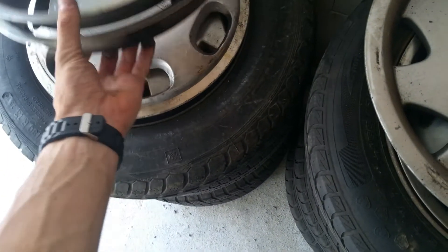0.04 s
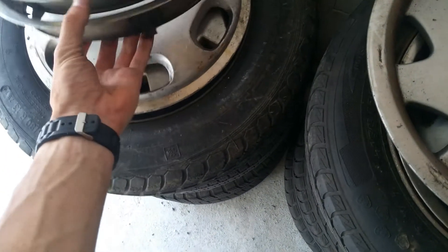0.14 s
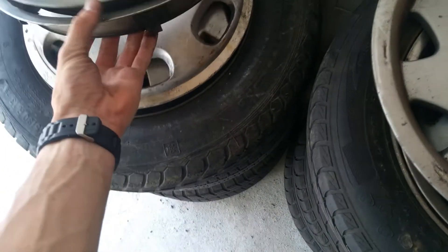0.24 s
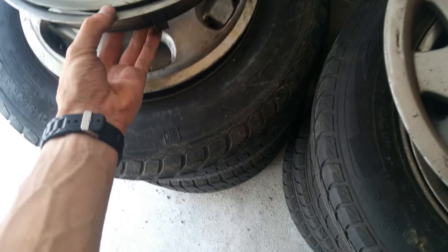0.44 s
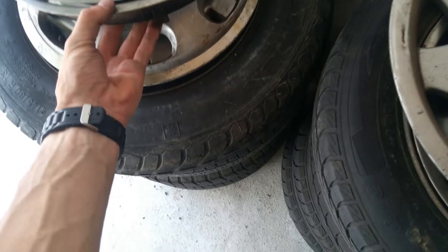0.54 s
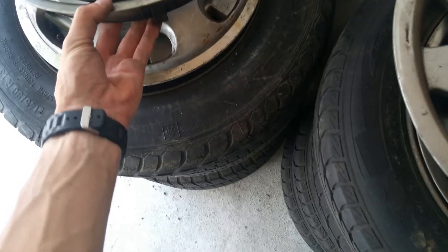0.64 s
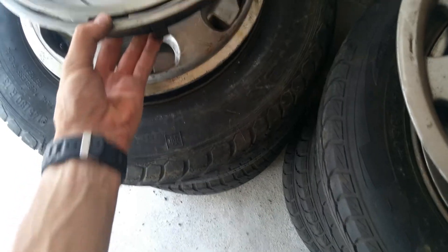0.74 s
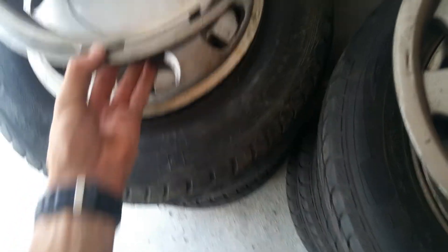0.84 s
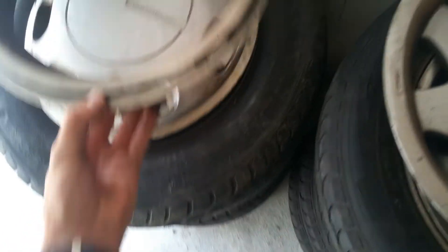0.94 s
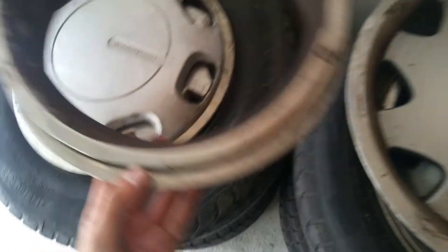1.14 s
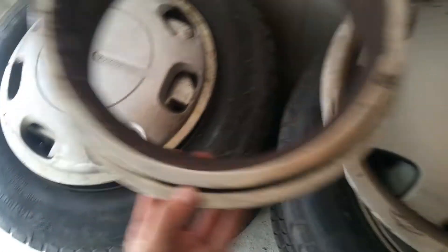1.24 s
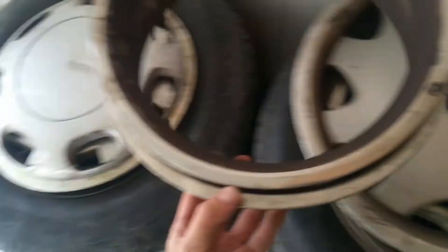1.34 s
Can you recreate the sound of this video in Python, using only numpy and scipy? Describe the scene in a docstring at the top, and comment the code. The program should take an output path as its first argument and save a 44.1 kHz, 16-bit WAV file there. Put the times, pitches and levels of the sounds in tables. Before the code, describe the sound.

A brief shrill metal-on-metal squeal as steel wheel rings are pulled apart, then small quiet clicks

```python
"""In a yard, thin steel trim rings are pulled off a stack, an arm's length from a hand-held stereo recorder.
An edge squeals as it sticks and slips, with one lone tone beside it, and later chatters at a rougher rate.
Gritty scraping and duller brushing are random grains; they and the slips ring the steel's many resonances.
The whole hoop wobbles low; small ticks, a creak and a faint touch sound as the rings shift in the hand.
Hard ground and walls echo it as fading noise tails, over a quiet outdoor floor of coloured noise."""
import sys
import numpy as np
from scipy import signal
from scipy.fft import rfft, irfft, next_fast_len
from scipy.io import wavfile
from scipy.ndimage import uniform_filter1d, minimum_filter1d

SR = 44100
rng = np.random.default_rng(int(sys.argv[2]) if len(sys.argv) > 2 else 0)


def file_out(sig):
    """Save sig as 16-bit WAV at sys.argv[1]."""
    # one column per channel
    cols = np.atleast_2d(sig).T
    # limit, then scale
    lim = np.clip(cols, -1, 1)
    pcm = np.round(lim * 32767).astype(np.int16)
    wavfile.write(sys.argv[1], SR, pcm)


def voltage_ratio(level):
    """Linear amplitude factor for a level in decibels (scalar or array-like)."""
    return 10 ** (np.asarray(level, float) / 20)


N = 61739  # length of the scene in samples


def squeal():
    """Edge on edge sticks and slips at a near-steady rate, which gives a tone with overtones."""
    # locked squeal: (time [s], slip rate [Hz], level [dB], irregularity [share of the rate])
    locked = [(.218, 1193, -59, 0.0069), (.229, 1186, -23, 0.0091), (.245, 1196, -20, 0.014),
              (.254, 1242, -7, 0.021), (.272, 1238, -24, 0.002), (.282, 1248, -17, 0.0042),
              (.315, 1253, -18, 0.0017), (.333, 1237, -24, 0.0024), (.352, 1203, -53, 0.0033),
              (.385, 1250, -37.5, .004), (.41, 1250, -105, .004)]
    # overtones of the slip rate: (multiple, relative level [dB])
    overtones = [(1, -2), (2, -2.5), (3, 0.5), (4, -6.5), (5, -10)]
    return slipping(locked, overtones, curve(locked, order=3), flutter_db=6.0)


def whistle():
    """A second spot of the edge sings one tone whose pitch wavers slightly."""
    # loudness of the tone: (time [s], level [dB])
    loudness = [(.245, -52), (.257, -23.5), (.28, -14.5), (.325, -31.5), (.35, -31.5), (.37, -81.5)]
    pitch_hz = 2415 * (1 + .002 * walk(156.4))
    return np.sin(2 * np.pi * np.cumsum(pitch_hz) / SR) * gain(loudness, order=1)


def chatter():
    """Later the edge slips without locking, so its rate wanders more."""
    # unlocked slipping: (time [s], slip rate [Hz], level [dB])
    unlocked = [(.45, 1280, -65), (.456, 1267, -22.5), (.463, 1279, -25), (.497, 1264, -27.5),
                (.507, 1240, -28.5), (.518, 1235, -21), (.54, 1232, -25.5), (.56, 1202, -37),
                (.58, 1330, -62.5)]
    # overtones of the slip rate: (multiple, relative level [dB])
    overtones = [(1, -0.5), (2, -2), (3, 5), (4, -1), (5, -29)]
    return slipping(unlocked, overtones, wander=.05, flutter_db=0.5)


def slipping(table, orders, wander, flutter_db):
    """Slips repeat at an unsteady rate; the level of each multiple of that rate flutters."""
    rate_hz = curve(table, order=1) * (1 + wander * walk(400))
    phase = 2 * np.pi * np.cumsum(rate_hz) / SR
    tone = sum(voltage_ratio(db + flutter_db * walk(170)) * np.sin(k * phase) for k, db in orders)
    return unit(tone) * gain(table, order=2)


def scrape():
    """Steel rasps on steel: returns the plain grains and the same grains coloured as grit."""
    # loudness of the rasp before the 6 dB lift below: (time [s], level [dB])
    loudness = [(0.19, -74), (0.22, -107), (0.232, -27), (0.24, -23.5), (0.316, -28), (0.384, -61.5),
                (0.448, -73), (0.462, -33), (0.546, -46), (0.59, -80), (0.686, -93), (0.694, -50.5),
                (0.734, -75.5), (0.75, -49.5), (0.796, -90.5), (0.86, -94.5)]
    # tone colour of the grit: (frequency [Hz], relative level [dB per Hz])
    grit = [(500, -45.5), (950, -11.5), (1300, -8), (2000, -16), (2850, -23.5), (3700, 1.5), (5000, -1.5),
            (6200, -2.5), (7000, -14.5), (10000, -15), (15000, -22.5), (16500, -38)]
    grains = rubbing(loudness, hiss=0.95) * voltage_ratio(6)
    return grains, shaped(grains, grit)


def brushing():
    """Hands and rings brush together: the same kind of grains, but duller."""
    # loudness of the brushing before the 6.5 dB lift below: (time [s], level [dB])
    loudness = [(0.0, -51.5), (0.014, -48.5), (0.054, -51.5), (0.07, -58.5), (0.104, -48.5), (0.116, -50.5),
                (0.132, -36.5), (0.198, -56.5), (0.24, -46), (0.248, -60), (0.358, -51), (0.376, -59.5),
                (0.466, -53.5), (0.478, -41), (0.606, -56.5), (0.62, -54.5), (0.704, -58), (0.72, -49.5),
                (0.74, -59.5), (0.758, -48.5), (0.782, -64), (0.94, -88)]
    # tone colour of the brushing: (frequency [Hz], relative level [dB per Hz])
    dull = [(150, -35.5), (250, -12), (470, -18.5), (703, -6.5), (2010, -3.5), (2200, -7.5), (3780, -6.5),
            (14100, -28.5), (15700, -35.5), (16500, -65.5)]
    return shaped(rubbing(loudness, hiss=0.17), dull) * voltage_ratio(6.5)


def rubbing(table, hiss):
    """Dense grains of uneven size, plus a hiss that differs left and right."""
    grains_per_s, spread_db = 9000, 2.2
    chance, side, size = rng.random((3, N))
    grains = (chance < grains_per_s / SR) * np.sign(side - .5)
    grains = grains * voltage_ratio(-spread_db * np.log(size + 0.001017))  # many small grains, few large ones
    noise = unit(grains) + hiss * rng.standard_normal((2, N))
    return noise * gain(table, order=1) * voltage_ratio(1.1 * walk(130))


def steel_ring(drive):
    """The steel answers slips and rubbing with many resonances; the hand damps them."""
    # resonances before the cap on fade time: (frequency [Hz], gain at resonance [dB], 60 dB fade time [s])
    resonances = [(1025, 4, 0.21), (1206, -3.5, .2), (1258, -8.5, 0.18), (1390, -12.5, .15),
                  (1500, -6.5, .15), (1630, -14.5, 0.18), (2032, 0.5, 0.31), (2390.3, 7.5, 0.38),
                  (2499, -2, 0.44), (2702, 0, 0.46), (2880, -12.5, 0.16), (3082, 5.5, .2),
                  (3692, -10, 0.05), (3630, -11, 0.36), (3773, 0.5, 0.1), (3790, -14.5, .35),
                  (4120, -0.5, 0.38), (4060, -12.5, .2), (4130, -7.5, 0.16), (4300, -13, .2),
                  (4610, -3, 0.54), (5000, -1.5, 0.39), (5166, -26, 0.076), (4930, -19, 0.33),
                  (5012, 6.5, 0.13), (5155, 2.5, 0.043), (5530, -2, .15), (5590, -4, .15),
                  (5844, -1.5, 0.043), (5840, -20, 0.099)]
    longest_s = .26
    held = [(hz, db, min(t60, longest_s)) for hz, db, t60 in resonances]
    return high(ring(drive, held, phase_rad=0.37), 930)


def ring(x, modes, phase_rad):
    """Resonators with a set gain at the centre, each with its own phase between left and right."""
    out = np.zeros((2, N))
    sides = np.array([[1], [-1]])
    for (hz, db, t60), turn in zip(modes, rng.standard_normal(len(modes))):
        r = np.exp(-np.log(1000) / (max(t60, .002) * SR))  # loss per sample
        z = signal.lfilter([2 * (1 - r) * voltage_ratio(db)], [1, -r * np.exp(2j * np.pi * hz / SR)], x)
        out += np.imag(z * np.exp(.5j * phase_rad * turn * sides))
    return out


def balance(x):
    """Tilts the tone colour between left and right, half the difference on each side."""
    # difference between the sides: (frequency [Hz], left minus right [dB])
    difference = [(60, -7), (110, 0.5), (200, 1.5), (380, 1.0), (700, 2), (1290, -1), (2380, -2.5),
                  (4400, -9.5), (8120, 6), (15000, 7.5)]
    return np.array([colour(x[0], difference, share=.5), colour(x[1], difference, share=-.5)])


def hoop():
    """The whole hoop wobbles at low pitches, shaken by the hand and knocked now and then."""
    # wobbles of the hoop: (frequency [Hz], relative gain [dB], 60 dB fade time [s])
    wobbles = [(100.8, 4.5, 0.23), (125, -6, .25), (193, -10.5, 0.16), (255.7, -5, 0.37), (281.3, -7, 0.12),
               (587.5, -14.5, .25), (690, -18.5, .2)]
    # how hard the hand shakes it: (time [s], level [dB])
    shaking = [(0.0, -45), (0.03, -50), (0.096, -46.5), (0.14, -36), (0.322, -48), (0.342, -59.5),
               (0.506, -40), (0.548, -48.5), (0.564, -56), (0.618, -50), (0.724, -48.5), (0.758, -53),
               (0.79, -51), (0.886, -87), (1.038, -71), (1.256, -69), (1.288, -70.5), (1.4, -83.5)]
    # blows that set it wobbling: (time [s], level [dB])
    blows = [(.137, -26), (.47, -36.5), (.49, -39), (.78, -37.5), (1.283, -52)]
    t = np.arange(N) / SR
    push = high(rng.standard_normal(N), 87)
    shaken = ring(push * voltage_ratio(curve(shaking, order=1)), wobbles, .15) / np.std(ring(push, wobbles, 0))

    def struck(hits):
        """Each blow is a smooth push about 2 ms wide."""
        pushes = sum(voltage_ratio(db) * np.exp(-((t - s) / .002) ** 2 * 8) for s, db in hits)
        return ring(pushes, wobbles, .1)

    one_blow_peak = np.abs(struck([(.1, 0)])).max()
    knocked = high(struck(blows), 66.0) / one_blow_peak
    return (shaken + knocked) * voltage_ratio(np.array([[.8], [-.8]]))  # left a little louder


def ticks():
    """Each tick is a short crack and one quickly fading note."""
    # ticks and knocks: (time [s], level [dB], pitch [Hz], 60 dB fade time [s], left minus right [dB])
    knocks = [(.016, -37, 767, 0.066, 3), (.1335, -22.5, 2080, 0.0073, -9.5),
              (.1345, -20.5, 1083, .02, -0.5), (.138, -21, 702, 0.014, 4), (.476, -40.5, 660, 0.0614, -7),
              (.697, -42.5, 5280, 0.052, 0), (.752, -40, 5240, 0.08, -2), (.754, -39.5, 603, .08, 2),
              (0.755, -35, 1500, 0.0208, -5), (1.2527, -28, 4620, 0.0074, -3.5),
              (1.2533, -38.5, 2490, .004, -11.5), (1.295, -47, 560, .05, 3),
              (1.333, -32.5, 1880, 0.0034, -15.5), (1.359, -36, 960, 0.019, -2.5),
              (1.36, -41, 418, 0.022, 3), (1.378, -49.5, 885, 0.055, 3)]
    crack_db, crack_s = -22.5, 0.00075  # level beside the note, fade constant
    out, t = np.zeros((2, N)), np.arange(N) / SR
    for s, db, hz, t60, pan_db in knocks:
        age = np.maximum(t - s, 0)
        crack = np.diff(rng.standard_normal(N + 1)) * np.exp(-age / crack_s) * voltage_ratio(crack_db)
        note = np.sin(2 * np.pi * hz * age) * np.minimum(age * hz, 1) * 1000. ** (-age / t60)
        out += (t >= s) * voltage_ratio(db) * (note + crack) * voltage_ratio(np.array([[pan_db], [-pan_db]]) / 2)
    return out


def creak():
    """A faint, brief buzz with its octave; pitch and level waver."""
    # the creak: length [s], pitch [Hz], level [dB], octave beside the pitch [dB]
    length, hz, db, octave_db = (.024, 865, -51, -3)
    age = np.arange(N) / SR - 1.277  # seconds since it starts
    phase = 2 * np.pi * np.cumsum(hz * (1 + .03 * walk(250))) / SR
    shape = np.clip(age / .004, 0, 1) * np.exp(-np.maximum(age - length, 0) / .01)
    return voltage_ratio(db + 4.0 * walk(120)) * shape * (np.sin(phase) + voltage_ratio(octave_db) * np.sin(2 * phase))


def touch():
    """One faint touch of the rims: a bright band of noise that fades."""
    # the touch: level [dB], lowest and highest frequency [Hz], 60 dB fade time [s]
    db, low_hz, high_hz, t60 = (-53, 3400, 6000, .14)
    age = np.arange(N) / SR - .913  # seconds since it starts
    band_pass = signal.butter(3, [low_hz, high_hz], "band", fs=SR, output="sos")
    band = signal.sosfilt(band_pass, rng.standard_normal((2, N)))
    return unit(band) * voltage_ratio(db) * (age > 0) * 1000. ** (-np.maximum(age, 0) / t60)


def grip():
    """Fingers shift on the rims at the end: soft coloured grains."""
    # loudness of the fingers: (time [s], level [dB])
    loudness = [(1.24, -92.5), (1.252, -62.5), (1.266, -69.5), (1.284, -55), (1.338, -56), (1.35, -65.5),
                (1.358, -54.5), (1.4, -60)]
    # tone colour of the fingers: (frequency [Hz], relative level [dB per Hz])
    soft = [(90, -3.5), (200, -6.5), (550, -1), (1000, -6), (2000, -4), (4000, -7), (6000, -20),
            (15000, -31.5), (16500, -51)]
    return shaped(rubbing(loudness, hiss=0.52), soft)


def echoes(x):
    """Hard ground and walls: a noise tail for each side, treble dying first."""
    level_db, t60_s, treble_t60_s, gap_s = -3.5, 0.3, 0.1, 0.0036
    t = np.arange(SR // 2) / SR
    low = signal.lfilter([.35], [1, -.6], rng.standard_normal((2, len(t))))
    full = 1.2 * rng.standard_normal((2, len(t)))
    tail = low * 1000. ** (-t / t60_s) + full * 1000. ** (-t / treble_t60_s)
    tail = tail * (t > gap_s)
    tail = tail / np.sqrt(np.sum(tail ** 2) / 2)
    return signal.fftconvolve(x, tail, axes=1)[:, :N] * voltage_ratio(level_db)


def yard():
    """Distant rumble and air as drifting noise; the bass is nearly the same left and right."""
    # tone colour of the yard: (frequency [Hz], relative level [dB per Hz])
    outdoors = [(15, -33.5), (25, -12), (167, -5.5), (358, -19), (389, -15.5), (617, -21), (706, -25),
                (854, -24.5), (1510, -26.5), (14000, -43), (16500, -45.5)]
    mid, side = rng.standard_normal((2, N))
    side = colour(side, [(100, -16.5), (400, -8.5), (1500, 2.5), (8000, -0.5)])
    floor = colour(mid + side * np.array([[1], [-1]]), outdoors)
    return unit(floor) * voltage_ratio(-59 + 1.5 * walk(1))


def unit(x):
    """Scales to an rms level of 1."""
    return x / np.sqrt(np.mean(x ** 2))


def curve(table, order):
    """Draws straight lines through one column of a table, over time."""
    rows = np.array(table, float)
    return np.interp(np.arange(N) / SR, rows[:, 0], rows[:, order])


def gain(table, order):
    """Turns a level column into a gain, silent outside the table."""
    t = np.arange(N) / SR
    return voltage_ratio(curve(table, order=order)) * (t >= table[0][0]) * (t <= table[-1][0])


def walk(rate_hz):
    """Smooth random wandering with rms 1, faster for a higher rate."""
    k = max(int(SR / rate_hz), 1)
    return unit(uniform_filter1d(uniform_filter1d(rng.standard_normal(N), k), k))


def colour(x, table, share=1):
    """Filters the spectrum by (frequency [Hz], gain [dB]) points; share scales the dB."""
    size = next_fast_len(N + 4096)
    rows, hz = np.array(table, float), np.arange(size // 2 + 1) * SR / size
    db = share * np.interp(np.log(hz + 1), np.log(rows[:, 0]), rows[:, 1])
    return irfft(rfft(x, size) * voltage_ratio(db), size)[..., :N]


def shaped(x, table):
    """Colours a sound so that white noise would come out at rms 1."""
    return colour(x, table) / np.std(colour(rng.standard_normal(N), table))


def high(x, hz):
    """High-pass: takes away what lies below a frequency."""
    return signal.sosfilt(signal.butter(4, hz, "high", fs=SR, output="sos"), x)


def scene():
    """Adds steel, small sounds, echoes, hoop and yard, left and right."""
    slips = squeal() + whistle() + chatter()
    grains, grit = scrape()
    brush = brushing()
    drive = slips * voltage_ratio(5.5) + grains[0] * voltage_ratio(6.5) + brush[0] * voltage_ratio(4.5)
    steel = balance(slips + grit + brush + steel_ring(drive))
    small = ticks() + creak() + touch() + grip()
    near = steel + small
    near[1] = np.interp(np.arange(N) - 2, np.arange(N), near[1])  # right side 2 samples late
    return near + echoes(steel + small * voltage_ratio(-15)) + hoop() + yard()


def band_limit(x):
    """A steep low-pass at the top of the band."""
    return signal.sosfilt(signal.butter(12, 16850, fs=SR, output="sos"), x)


def record(dry):
    """A look-ahead limiter turns the level down smoothly around the loudest peaks."""
    ceiling, span = .89, int(.003 * SR)  # highest peak, 3 ms in samples
    need = np.minimum(ceiling / (np.abs(dry).max(axis=0) + 1e-9), 1)
    limiter_gain = uniform_filter1d(minimum_filter1d(need, size=2 * span), size=span)
    return band_limit(dry * limiter_gain)


dry = scene()
out = record(dry)
file_out(out)
```